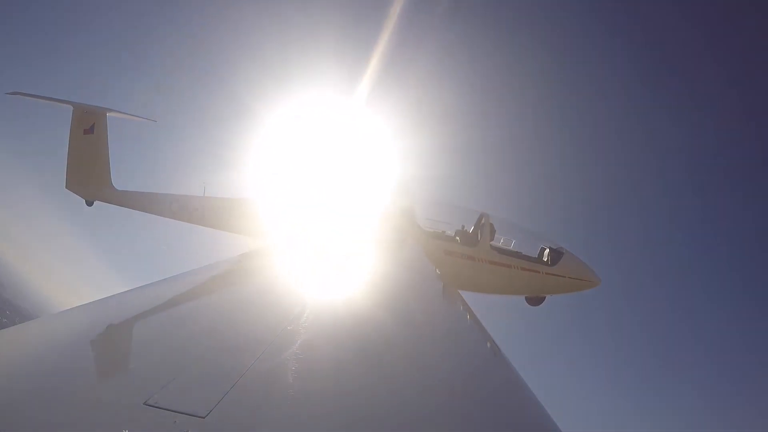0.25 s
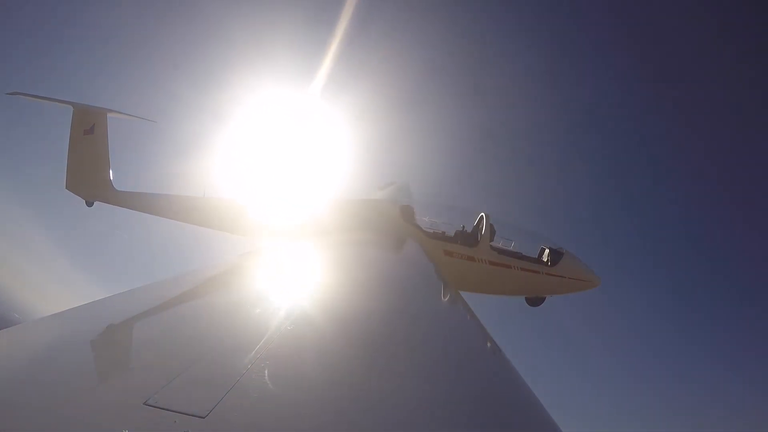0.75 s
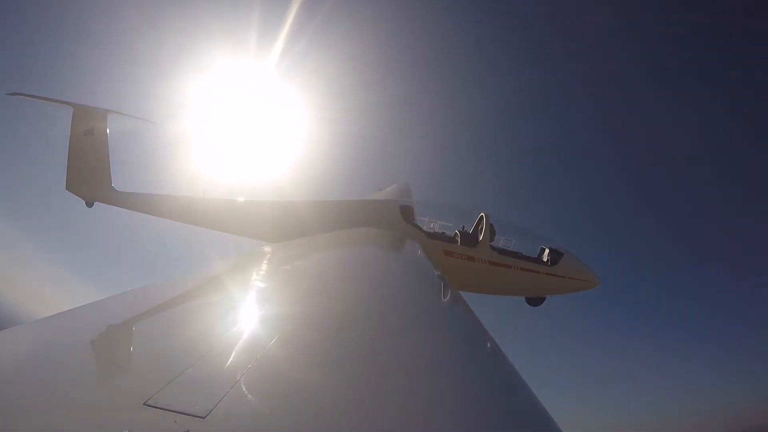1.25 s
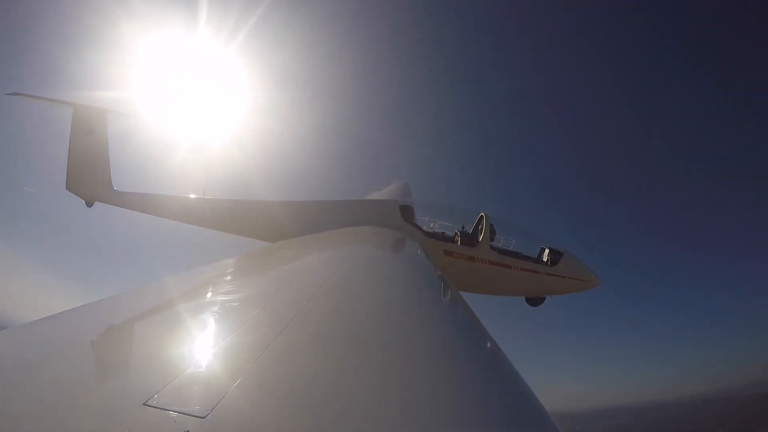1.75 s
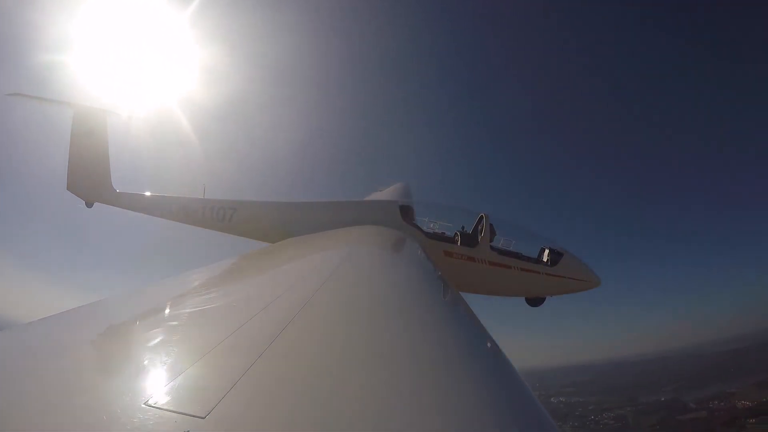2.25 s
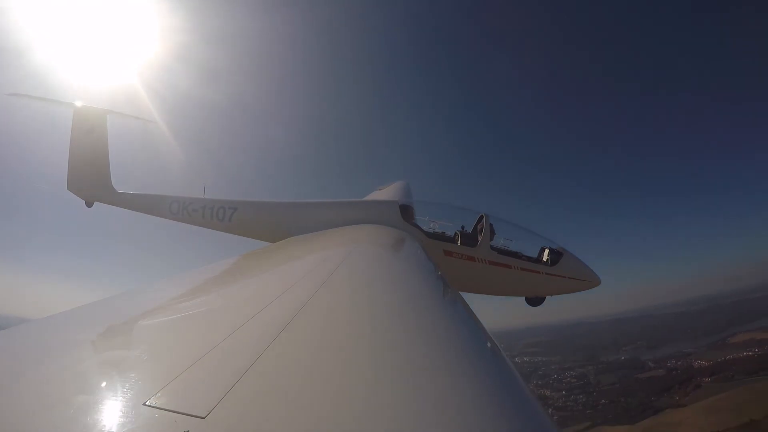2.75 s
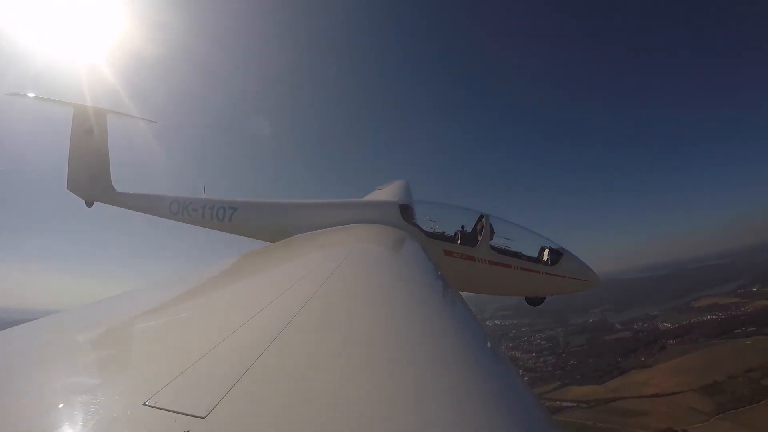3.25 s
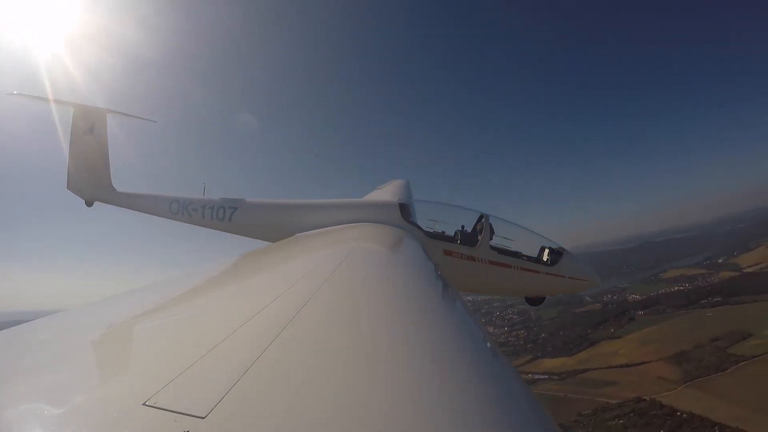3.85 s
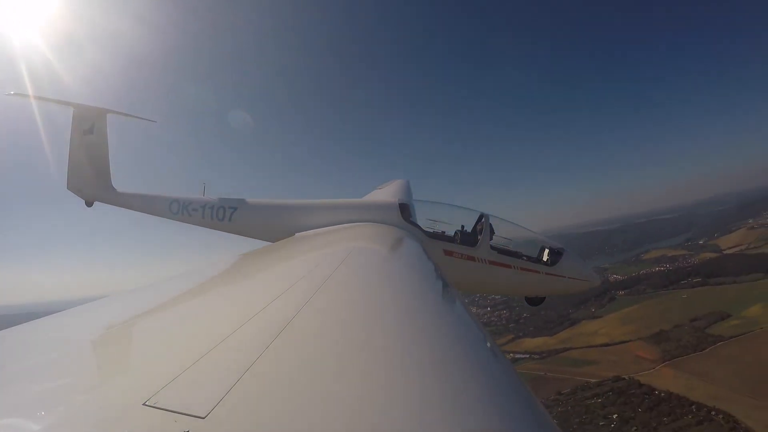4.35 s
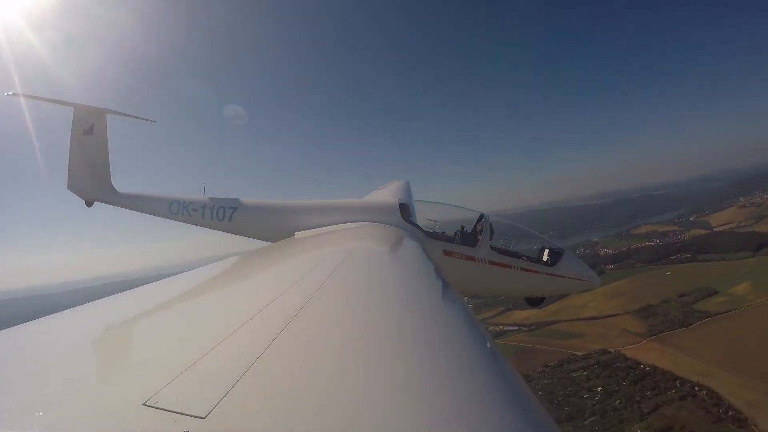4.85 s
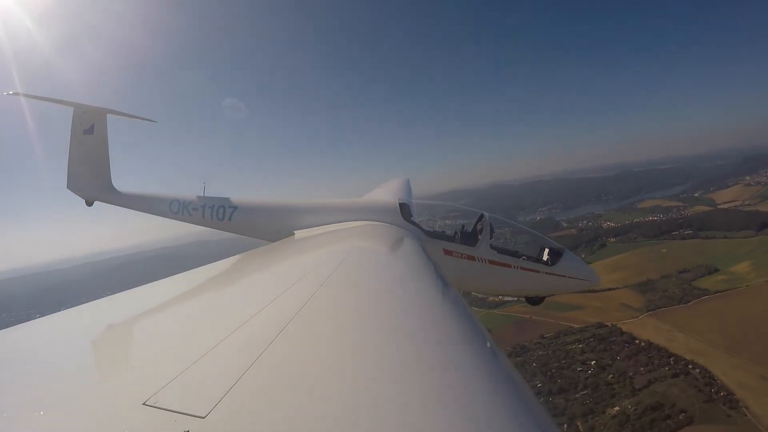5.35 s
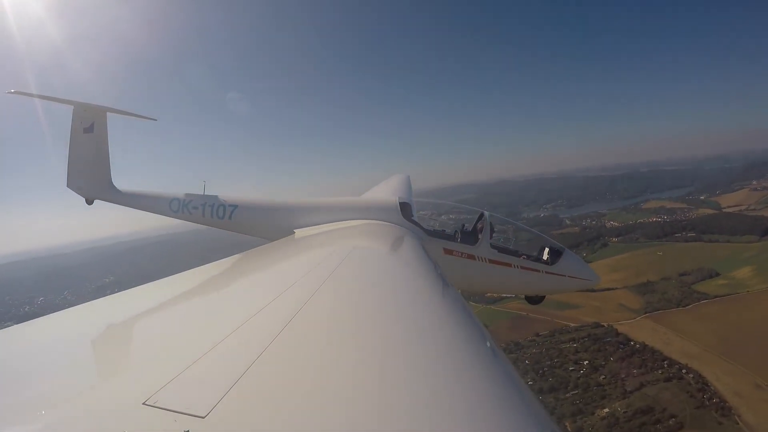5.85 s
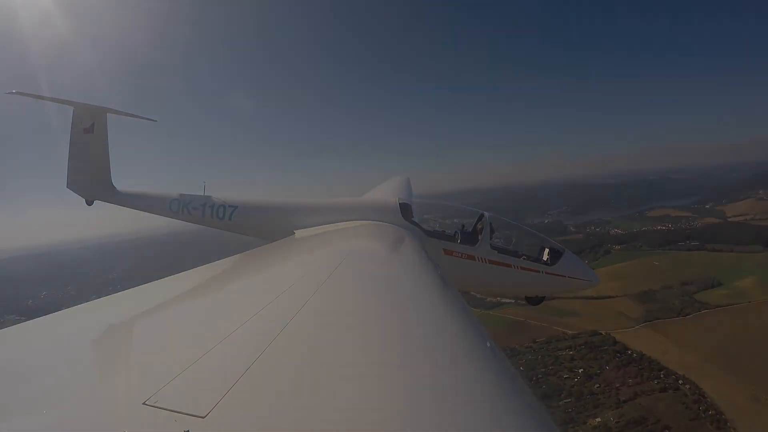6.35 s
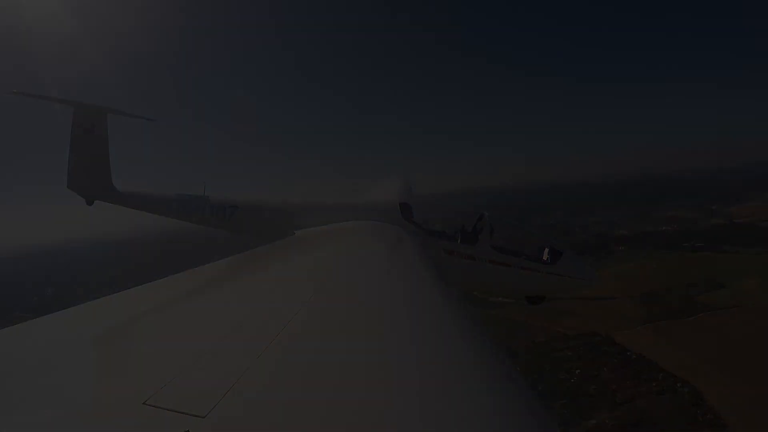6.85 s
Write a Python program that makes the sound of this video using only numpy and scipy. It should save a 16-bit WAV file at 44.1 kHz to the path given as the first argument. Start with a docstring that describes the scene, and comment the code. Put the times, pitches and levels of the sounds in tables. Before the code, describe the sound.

Steady in-flight wind, heard very close from inside a small camera case on a glider wing. Dense, noisy high whistling dominates, over a broad rush and a low wavering hum that pulses irregularly. Soft deep rumbles come in gusts; faint, thinner whistles appear near the top of the hiss. There is no engine and no echo, and the flow slackens only in the last moments. The sound is mono.

```python
"""A breathy high whistle sings over roaring, hissing air: a camera housing on the wing of a glider
that rolls out of a turn. The air is noise coloured by the housing's resonances; the mount's throbbing hum
is a wavering sine with narrow noise, surging at times. Low noise rumbles and shakes the camera in the wake.
Thin edge whistles, narrow bands of noise, come and go. The sound is mono."""
import sys
import numpy as np
from scipy.fft import rfft, irfft, next_fast_len
from scipy.io import wavfile
from scipy.ndimage import map_coordinates

SR = 44100
rng = np.random.default_rng(int(sys.argv[2]) if len(sys.argv) > 2 else 0)


def wav_out(sig):
    """Save sig, one row per channel (or a flat mono array), as 16-bit PCM at SR to the path in sys.argv[1]."""
    wavfile.write(sys.argv[1], SR, np.round(np.clip(np.atleast_2d(sig).T, -1, 1) * 32767).astype(np.int16))


N = 313989


def amp(db):
    """Decibels to gain."""
    return 10 ** (np.asarray(db) / 20)


def unit(x):
    """Scale to rms 1."""
    return x / np.sqrt(np.mean(x ** 2) + 1e-20)


def along(points, hz):
    """Read (frequency [Hz], value) points on a log frequency axis."""
    point_hz, values = np.transpose(points)
    return np.interp(np.log(hz + 1), np.log(point_hz + 1), values)


def wobble(rate):
    """A smooth random curve of rms 1, with rate random knots a second."""
    knots = rng.standard_normal(4096)
    position = np.arange(N) * rate / SR
    return unit(map_coordinates(knots, [position], mode="wrap"))


def swell(start, length, ramp_s):
    """Gain that rises smoothly to 1 by start, holds for length and falls again."""
    t = np.arange(N) / SR
    outside = np.maximum(start - t, t - start - length)
    return np.cos(np.pi / 2 * np.clip(outside / ramp_s, 0, 1)) ** 2


def swells(rows, ramp_s):
    """The summed gain of a table of swells."""
    return sum(amp(db) * swell(start, length, ramp_s) for start, length, db in rows)


def filtered(x, response):
    """Filter x by a gain that is a function of frequency."""
    size = next_fast_len(N + SR // 2)  # padding keeps the end from wrapping onto the start
    spectrum = rfft(x, size) * response(np.fft.rfftfreq(size, 1 / SR))
    return irfft(spectrum, size)[..., :N]


def turbulence(response):
    """Noise of rms 1 with the given colour."""
    return unit(filtered(rng.standard_normal(N), response))


def resonance(hz, centre_hz, width_hz):
    """Gain of a steep-sided resonance: 1 at its centre, a half at the edges of its width."""
    detuning = (hz ** 2 - centre_hz ** 2) / (hz * width_hz + 1e-9)
    return 1 / (1 + detuning ** 2)


# Relative spectrum of the air rushing over the housing: (frequency [Hz], density [dB per Hz])
RUSH_COLOUR = [(120, -20), (230, -14.5), (310, -15), (450, -14.5), (900, -12), (1380, -13.5), (1700, -9),
               (2400, -7), (3000, -9), (4250, -36), (6200, -27.5), (7900, -25.5), (9400, -34),
               (15200, -43.5)]
# Resonances of the housing: (centre [Hz], width [Hz], relative level [dB])
HOUSING_RESONANCES = [(815, 53, -15.5), (1184, 123, -10), (1830, 33, -8), (1979, 93, -4.5),
                      (3240, 130, -5.5), (3573, 350, 0.9), (3856, 354, -4), (4460, 145, -13),
                      (4680, 430, -14), (5180, 250, -22.6), (5620, 480, -21.5), (6630, 350, -27.5),
                      (7530, 1660, -33), (10270, 1000, -37), (12300, 1200, -33), (13210, 810, -39.4)]


def housing(hz):
    """Colour of the air on the housing: separate eddies drive each resonance, so their powers add."""
    rush = amp(along(RUSH_COLOUR, hz)) ** 2
    ringing = sum((amp(db) * resonance(hz, centre, width)) ** 2 for centre, width, db in HOUSING_RESONANCES)
    return np.sqrt(rush + ringing)


# Eddies from large to small (roar, rush, whistle, hiss):
# (level at 0 dB flow [dB], growth [dB per dB of flow])
EDDY_LEVELS = [(-28.8, 1.3), (-20.5, 0.73), (-18.1, 0.4), (-33, 1.15)]


def airflow(flow_db, flutter_db=0.23, drift_db=0.14):
    """Large eddies roar, smaller ones rush, whistle and hiss; each drifts alone and all flutter together."""
    edges_hz = [0, 1050, 3100, 4950, SR / 2]
    air = np.zeros(N)
    for (db, growth), low, high in zip(EDDY_LEVELS, edges_hz, edges_hz[1:]):
        level_db = db + growth * flow_db + drift_db * wobble(rate=6)
        band = turbulence(lambda hz: housing(hz) * (hz >= low) * (hz < high))
        air += amp(level_db) * band
    return air * amp(flutter_db * wobble(rate=25))


# Broad low spectrum of the eddies on the mount: (frequency [Hz], relative density [dB per Hz])
BUFFET_COLOUR = [(10, -32), (30, -2), (75, -2), (100, -0.5), (135, 0.5), (190, -6.5), (225, -14.5),
                 (400, -45), (1000, -90)]


def buffet(flow_db, level_db=-28.0, growth=0.7):
    """Large eddies rumble on the housing, louder with the flow (growth in dB per dB)."""
    rumble = turbulence(lambda hz: amp(along(BUFFET_COLOUR, hz)))
    return amp(level_db + growth * flow_db) * rumble


# Strong pushes that make the mount's hum surge: (start [s], length [s], level [dB])
HUM_SURGES = [(.08, 0.098, -26), (.37, .15, -24.5), (1.16, 0.15, -25.5), (1.44, 0.055, -24),
              (1.91, 0.061, -26), (2.22, 0.12, -22.5), (2.77, 0.031, -26), (3.34, .13, -22.5),
              (3.52, 0.14, -28), (3.72, 0.061, -21.5), (4.6, 0.054, -23), (4.95, 0.053, -24),
              (5.44, 0.072, -23), (5.65, 0.035, -25), (5.87, 0.059, -24)]


def hum(flow_db, level_db=-29.0, growth=0.88, throb_db=3, waver_hz=4, rough=0.47, centre_hz=139, width_hz=45):
    """Shed vortices swing the mount at its own pitch; uneven pushes make it throb and now and then surge."""
    pitch_hz = centre_hz + waver_hz * wobble(rate=14)
    swing = np.sqrt(2) * np.sin(2 * np.pi * np.cumsum(pitch_hz) / SR)
    pushes = turbulence(lambda hz: resonance(hz, centre_hz, width_hz))
    throb = amp(level_db + growth * flow_db) * unit(amp(throb_db * wobble(rate=22)))
    level = np.hypot(throb, swells(HUM_SURGES, ramp_s=0.038))  # throb and surges add as powers
    return level * unit(swing + rough * pushes)


# Gusts that rock the camera: (start [s], length [s], level [dB])
ROCKING_GUSTS = [(.1, 0.68, -28.5), (1.32, .3, -27), (3.45, 0.22, -27), (4.28, .08, -28), (4.9, 0.18, -28)]


def shake(level_db=-36, centre_hz=23, width_hz=11):
    """The wake rocks the camera at a deep resonance, harder in gusts."""
    rocking = np.hypot(amp(level_db), swells(ROCKING_GUSTS, ramp_s=0.1))
    return rocking * turbulence(lambda hz: resonance(hz, centre_hz, width_hz))


# Thin edge whistles: (start [s], length [s], level [dB], pitch [Hz], width [Hz])
EDGE_WHISTLES = [(2.05, .9, -52, 8900, 700), (1.1, .15, -54, 11950, 750), (5.8, .85, -49, 11950, 750)]


def edge_whistles():
    """Air grazing an edge sings in a narrow band while it meets it at the right angle."""
    whistles = np.zeros(N)
    for start, length, db, centre_hz, width_hz in EDGE_WHISTLES:
        tone = turbulence(lambda hz: resonance(hz, centre_hz, width_hz))
        whistles += amp(db) * swell(start, length, ramp_s=0.3) * tone
    return whistles


# Strength of the airflow through the roll-out: (time [s], level [dB])
FLOW_STRENGTH = [(0, 0), (.3, 0), (.85, -0.5), (1.8, -0.2), (2.2, .3), (4.5, 0), (5.3, 1.06), (5.7, 0),
                 (6.4, 0.5), (7.12, -3.5)]


def scene():
    """Everything reaches one microphone inside the housing and feeds both channels."""
    times, levels = np.transpose(FLOW_STRENGTH)
    flow_db = np.interp(np.arange(N) / SR, times, levels)
    mono = airflow(flow_db) + buffet(flow_db) + hum(flow_db) + shake() + edge_whistles()
    return np.array([mono, mono])


def record(dry, top_hz=15280):
    """The camera keeps nothing above its band limit."""
    return filtered(dry, lambda hz: hz < top_hz)


dry = scene()
out = record(dry)
wav_out(out)
```